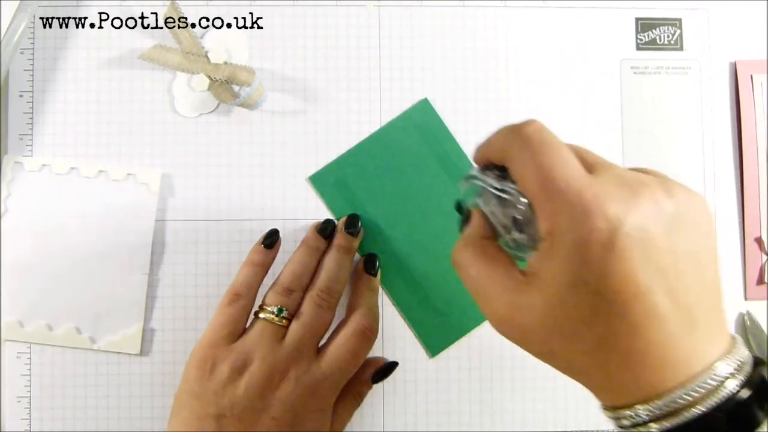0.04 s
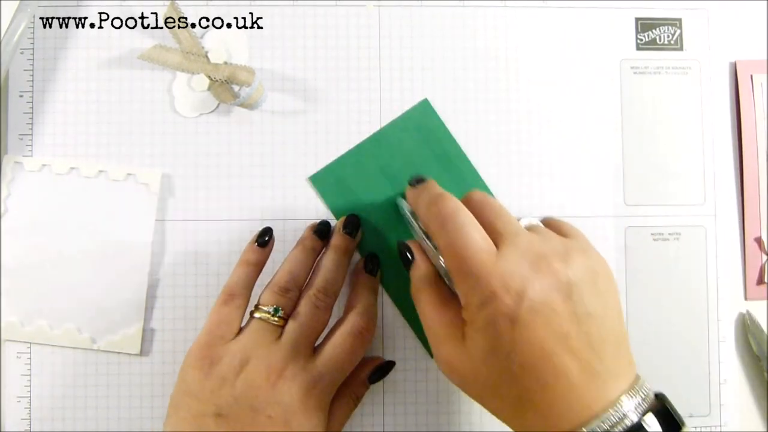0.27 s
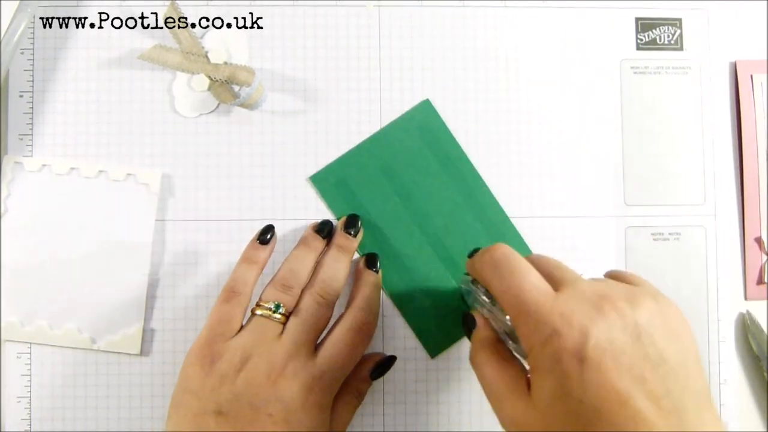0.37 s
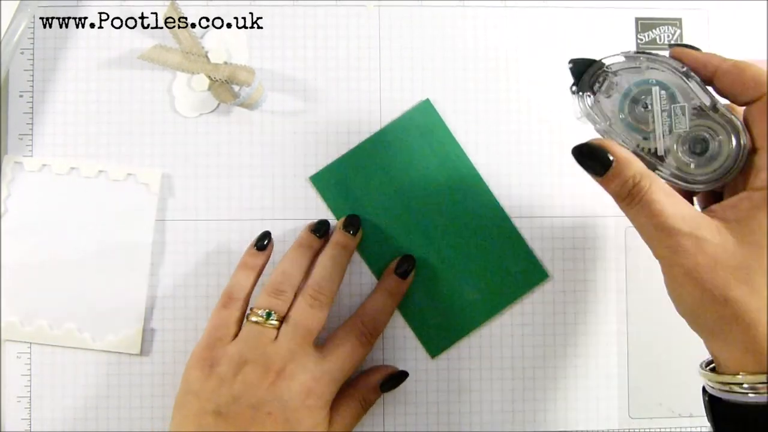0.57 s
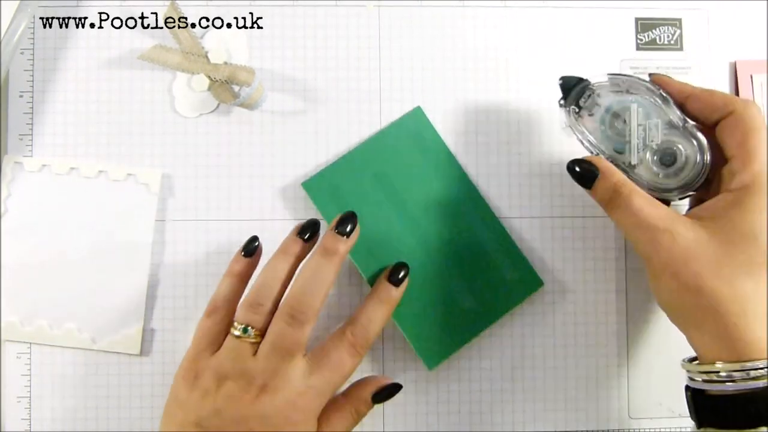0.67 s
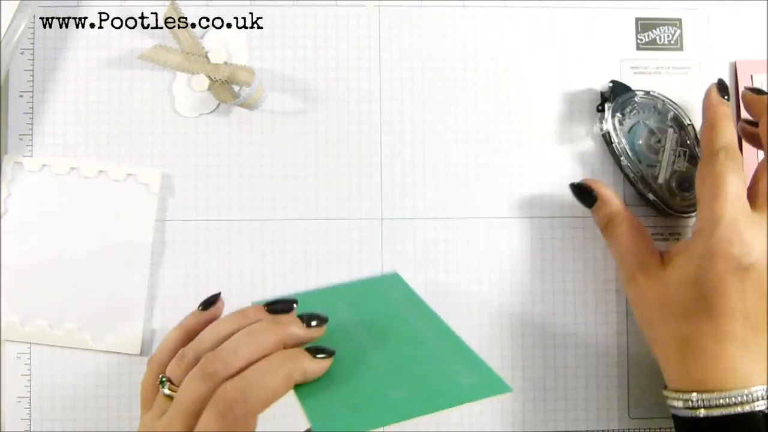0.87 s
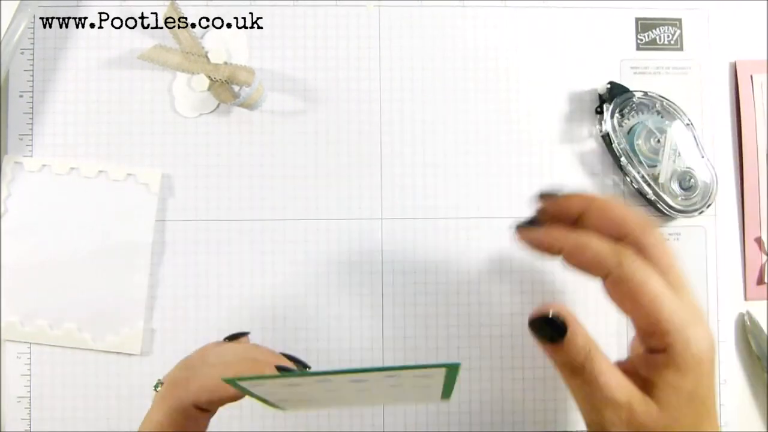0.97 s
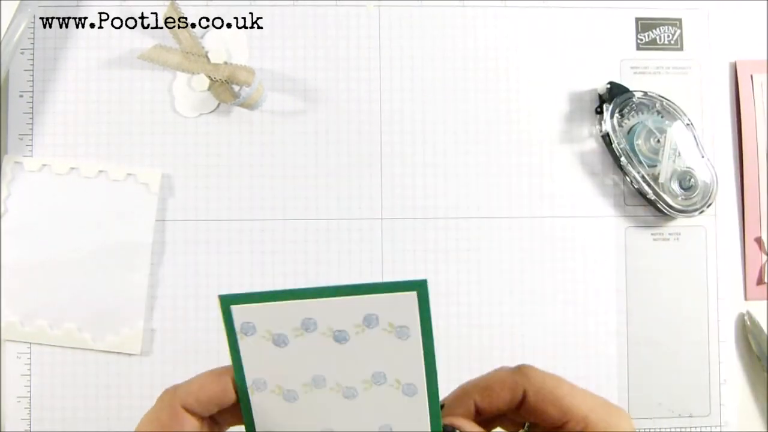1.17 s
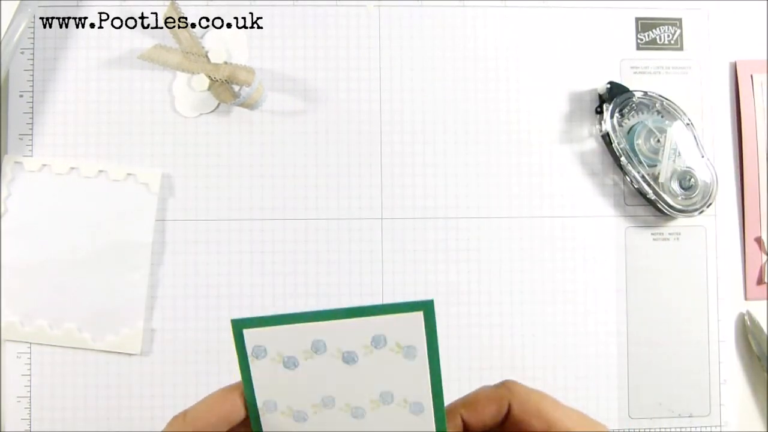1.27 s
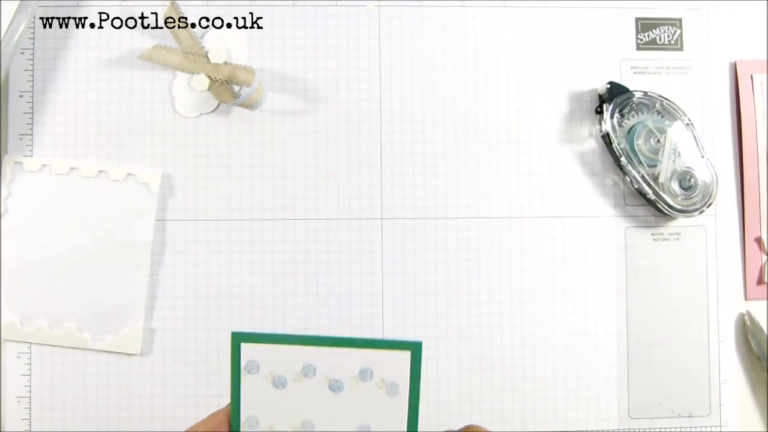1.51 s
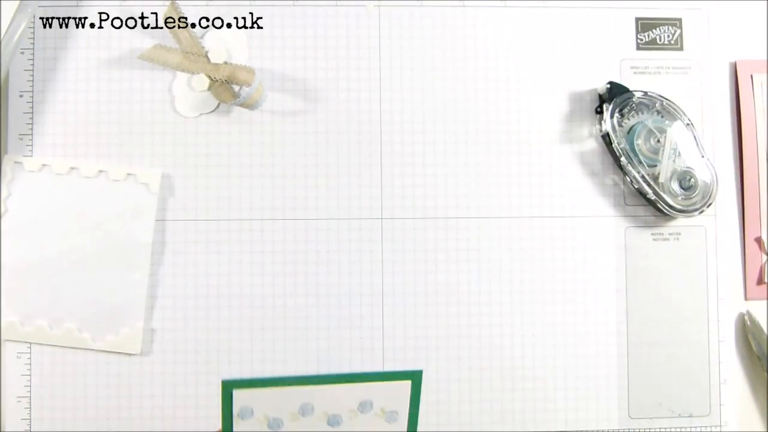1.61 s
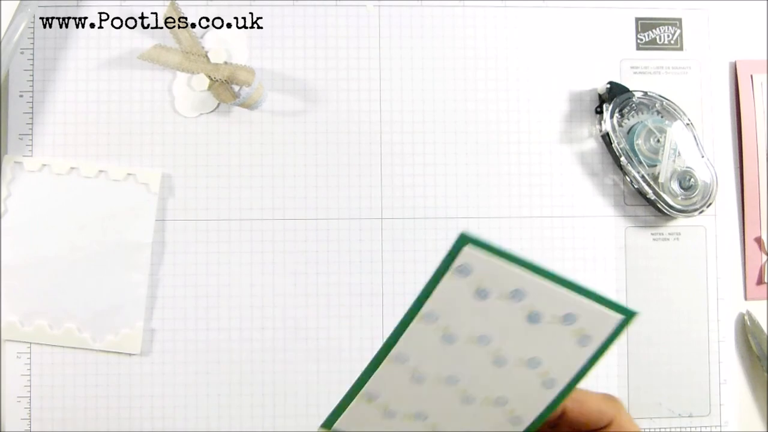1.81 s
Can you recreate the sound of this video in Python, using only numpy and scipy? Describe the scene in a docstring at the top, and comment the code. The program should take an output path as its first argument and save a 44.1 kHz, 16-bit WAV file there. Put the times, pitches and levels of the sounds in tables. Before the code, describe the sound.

An adhesive tape runner taps onto card, makes one quick, rasping zip, then its plastic case rattles and knocks as it is set down; light card flicks and taps follow in a quiet room, closely miked.

```python
"""First a quiet room with faint hiss and a low hum; then a tape runner lands on card, zips across it,
rattles and is put down on a craft table, and fingers flick, tap and slide the card.
The zip is dense random clicks, the knocks and flicks are short crackles; both ring case or card filters.
Decaying sine waves make the table top boom. Delays and fading noise make the room around it all."""
import sys
import numpy as np
from scipy import signal
from scipy.fft import rfft, irfft, next_fast_len
from scipy.io import wavfile
from scipy.ndimage import uniform_filter1d

SR = 44100
rng = np.random.default_rng(int(sys.argv[2]) if len(sys.argv) > 2 else 0)


def master_out(mix):
    """Clip the mix to full scale and print it as 16-bit PCM to the path in sys.argv[1]."""
    frames = np.transpose(np.atleast_2d(mix))
    ceiling = np.clip(frames, -1, 1)
    pcm = np.round(ceiling * 32767).astype(np.int16)
    wavfile.write(sys.argv[1], SR, pcm)


def field_ratio(decibels):
    """Amplitude ratio for a level in dB (20 dB per decade); scalars and array-likes work."""
    return 10 ** (np.asarray(decibels, dtype=float) / 20)


N = 81585  # length in samples


def unit(x):
    """Scale a sound to an rms strength of 1."""
    return x / np.sqrt(np.mean(x ** 2) + 1e-30)


def shape(x, gain):
    """Filter a sound by a gain that is a function of frequency in Hz."""
    size = next_fast_len(x.shape[-1] + 4096)
    hz = np.maximum(np.fft.rfftfreq(size, 1 / SR), 1)
    return irfft(rfft(x, size) * gain(hz), size)[..., :x.shape[-1]]


def colour(points):
    """Join (Hz, dB) points into a smooth gain along a logarithmic frequency axis."""
    hz, db = np.array(points).T
    return lambda f: field_ratio(np.interp(np.log(f), np.log(hz), db))


def high_pass(low_hz):
    """Gentle bass cut: a first-order filter."""
    return lambda f: 1j * f / (low_hz + 1j * f)


def tilt(db_per_octave, low_hz):
    """Brightness slope pivoting at 3 kHz, together with a second-order bass cut."""
    power = db_per_octave / (20 * np.log10(2))
    return lambda f: (1j * f / 3000) ** power * high_pass(low_hz)(f) ** 2


def ring(hz, width):
    """One resonance: a band-pass filter whose gain is 1 at its centre."""
    return lambda f: 1j * f * width / (hz ** 2 - f ** 2 + 1j * f * width)


def body(modes, struck_hz=None, focus_db=0):
    """All resonances of an object together; those near struck_hz are struck harder."""
    focus_octaves = 0.38

    def boost(hz):
        if struck_hz is None:
            return 0
        return focus_db * np.exp(-(np.log2(hz / struck_hz) / focus_octaves) ** 2)

    return lambda f: sum(field_ratio(db + boost(hz)) * ring(hz, width)(f) for hz, width, db in modes)


def walk(rate):
    """Smooth random level with spread 1: noise averaged twice over 1/rate seconds."""
    k = max(int(SR / rate), 1)
    noise = rng.standard_normal(N)
    return unit(uniform_filter1d(uniform_filter1d(noise, k), k))


def grit(size, per_s, spread_db):
    """Random clicks of either sign and of scattered, bounded strength."""
    present = rng.random(size) < per_s / SR
    strength = field_ratio(spread_db * np.minimum(rng.exponential(size=size), 3))
    return present * strength * np.sign(rng.standard_normal(size))


def add(out, start_s, x):
    """Mix x into out at start_s seconds."""
    i = int(start_s * SR)
    out[i:i + len(x)] += x[:len(out) - i]


def burst(db, length, gain):
    """A first click and a dying crackle through a filter; its energy follows level and length."""
    crackle_db, crackles_per_s, ring_s = -10, 4000, 0.0015
    t = np.arange(4096) / SR
    fade = np.exp(-t / max(length, 2e-4))
    x = field_ratio(crackle_db) * grit(4096, crackles_per_s, 2.7) * fade
    x[0] = 1  # the first click
    x = shape(x, gain)
    return field_ratio(db) * x * np.sqrt((length + ring_s) * SR / 20 / np.sum(x ** 2))


def widen(mid, side):
    """Make left and right differ mostly in the treble."""
    wide_hz, wide_db, wide_bass_db = 5560, 3, -18
    side = shape(side, lambda f: field_ratio(wide_db) * high_pass(wide_hz)(f) + field_ratio(wide_bass_db))
    return np.array([mid + side, mid - side])


# colour of the still room's hiss: (frequency [Hz], relative level [dB per Hz])
ROOM_HISS = [(15, -69), (25, -11), (108, -5.5), (263, -10), (405, -9.5), (607, -18), (936, -12.5),
             (1040, -18), (1160, -17), (11600, -25), (16000, -30.5)]
# hum lines: (frequency [Hz], level [dB])
HUM_LINES = [(57, -67.5), (114, -67.5), (172, -64)]


def air(t):
    """Steady hiss of the room, as coloured noise, and a hum of sine waves that waver in level."""
    hiss_db, waver_db = -63.5, -1
    mid, side = shape(rng.standard_normal((2, N)), colour(ROOM_HISS))
    # the hiss level counts only what lies above 200 Hz
    scale = field_ratio(hiss_db) / np.std(shape(mid, lambda f: f > 200))
    hum = sum(field_ratio(db + waver_db * walk(5.8)) * np.sin(2 * np.pi * hz * t) for hz, db in HUM_LINES)
    return scale * widen(mid, side) + hum


def fading(noise, t, t60):
    """Noise that dies by 60 dB in t60 seconds, scaled to the same energy for any t60."""
    return noise * 1000. ** (-t / t60) / np.sqrt(t60 * SR / np.log(1e6))


def scatter(x):
    """Dense short random reflections from hands and things nearby, redrawn every 12 ms."""
    redraw_s, near_t60_s, near_db, low_hz = 0.012, 0.073, -1, 504
    hop, size = int(redraw_s * SR), 8192
    t = np.arange(4096) / SR
    starts = np.arange(0, N, hop)
    # cut the sound into overlapping pieces and give each its own random reflections
    padded = np.pad(x, (hop, 2 * hop))
    pieces = padded[starts[:, None] + np.arange(2 * hop)] * np.hanning(2 * hop)
    reflections = fading(rng.standard_normal((2, len(starts), len(t))), t, near_t60_s)
    wet = irfft(rfft(pieces, size) * rfft(reflections, size), size)
    out = np.zeros((2, N + 2 * size))
    for k, i in enumerate(starts):
        out[:, i:i + size] += wet[:, k]
    return field_ratio(near_db) * shape(out[:, hop:hop + N], high_pass(low_hz))


# reflections from the table: (delay [s], level [dB])
REFLECTIONS = [(.0016, -20.5), (.0062, -15), (.0091, -13)]


def room(x):
    """Direct sound, table reflections, near scatter and a tail of bright and dull fading noise."""
    tail_db, bright_t60_s, dull_t60_s = -14, 0.45, 0.25
    t = np.arange(SR // 2) / SR
    bright, dull = rng.standard_normal((2, 2, len(t)))
    dull = unit(shape(dull, lambda f: 1 / (1 + 1j * f / 2500)))
    tail = fading(bright, t, bright_t60_s) + fading(dull, t, dull_t60_s)
    response = field_ratio(tail_db) * tail * np.minimum(t / 0.013, 1)  # the tail builds up over 13 ms
    for k, (delay, db) in enumerate(REFLECTIONS):
        response[:, int(delay * SR)] += field_ratio(db) * np.array([1, (-1) ** k])  # side flips each time
    response[0, 0] = 1  # direct sound
    mid, side = np.array([signal.fftconvolve(x, h)[:N] for h in response]) + scatter(x)
    return widen(mid, side)


# ringing modes of the table top: (frequency [Hz], relative level [dB], time to die by 60 dB [s])
TABLE_MODES = [(60.3, -13, 0.29), (82, -3, 0.28), (167.4, -6.5, .3), (255, -1, 0.096), (380, -8, 0.18),
               (550, -16.5, 0.13)]
# pushes: (time [s], relative level [dB], contact length [s], frequency of the modes most excited [Hz])
TABLE_PUSHES = [(.186, -43, 0.0017, 82), (.272, -45, 0.00085, 255), (0.314, -43, 0.0019, 255),
                (.36, -42, 0.0031, 171), (.563, -43, 0.0047, 117), (.746, -46.5, 0.0017, 255),
                (.837, -38, 0.0027, 82), (.907, -51, 0.0032, 82)]


def table(roll):
    """Soft pushes and the shaking roller ring the table top's decaying sine waves."""
    roll_db, focus_db = -27, 9.5
    t = np.arange(SR) / SR
    modes = np.array([field_ratio(db) * np.sin(2 * np.pi * hz * t) * 1000. ** (-t / t60)
                      for hz, db, t60 in TABLE_MODES])
    shaking = field_ratio(roll_db) * roll * rng.standard_normal(N) / 20
    out = signal.fftconvolve(shaking, modes.sum(0))[:N]
    mode_hz = np.array(TABLE_MODES)[:, 0]
    for s, db, contact, hz in TABLE_PUSHES:
        pulse = np.hanning(max(int(contact * SR), 4))
        nearness = np.exp(-np.log2(mode_hz / hz) ** 2 * 2)
        weight = field_ratio(db + focus_db * nearness)
        add(out, s, signal.fftconvolve(weight @ modes, pulse / pulse.sum()))
    return out


# resonances of the card: (frequency [Hz], width [Hz], relative level [dB])
CARD_MODES = [(375, 50, -3.5), (535, 30, -11), (940, 220, -0.5), (1490, 200, -7), (2450, 560, -1.5),
              (3400, 440, -1), (5100, 1600, -18)]
# flicks and creases of the card: (time [s], relative level [dB], frequency of the modes most
# excited [Hz], brightness [dB per octave], crackle length [s])
CARD_FLICKS = [(1.198, -48, 2450, -6.5, 0.0076), (1.2215, -33, 1010, -4.5, 0.0032),
               (1.261, -55, 2440, 2, 0.0025), (1.3307, -20, 3250, -0.5, 0.0033),
               (1.4507, -35, 3350, -3.5, 0.0031), (1.551, -54, 2480, 4, 0.0046),
               (1.5638, -21, 3320, -4, 0.0013), (1.5655, -26.5, 380, -6, 0.0029),
               (1.588, -39, 3330, -1.5, 0.0047)]
# card sliding under the fingers: (start [s], rise [s], fall [s], level [dB], brightness [dB per octave])
CARD_SLIDES = [(-.05, 0.043, 0.04, -58, -5.5), (.19, 0.008, 0.022, -36, -6.5),
               (.52, 0.022, 0.071, -57.5, -2), (0.628, 0.0087, 0.028, -53, -9),
               (.87, 0.016, 0.032, -43, -25), (1.06, 0.035, 0.23, -63.5, -4),
               (1.15, 0.066, 0.014, -52.5, -3.5), (1.34, 0.048, 0.044, -56, -5.5),
               (1.733, 0.012, 0.055, -54.5, 1), (1.74, 0.042, 0.044, -54, 1)]


def card(t):
    """Flicks are crackles with a short papery ring; slides are soft, flickering grit."""
    ring_db, focus_db, flick_low_hz = 0.5, 5, 320
    slide_low_hz, flicker_db = 1260, 2
    out = np.zeros(N)
    for s, db, hz, bright, length in CARD_FLICKS:
        slope, paper = tilt(bright, flick_low_hz), body(CARD_MODES, hz, focus_db)
        add(out, s, burst(db + 2.5, length, lambda f: slope(f) * (1 + field_ratio(ring_db) * paper(f))))
    for s, rise, fall, db, bright in CARD_SLIDES:
        u = t - s - rise  # time from the loudest moment
        growing = np.clip(1 + u / rise, 0, 1) ** 2
        dying = np.exp(-np.maximum(u, 0) / fall)
        envelope = np.where(u < 0, growing, dying)
        rub = unit(shape(grit(N, 9000, 1.72), tilt(bright, slide_low_hz)))
        out += field_ratio(db + flicker_db * walk(26.7)) * envelope * rub
    return out


# resonances of the plastic case, also rung by the zip: (frequency [Hz], width [Hz], relative level [dB])
CASE_MODES = [(1290, 200, -6.5), (1661, 260, 6.5), (2080, 200, -1.5), (2900, 83, 3.5), (3400, 640, -3),
              (4300, 440, 3), (5050, 660, -0.5), (6800, 430, 4), (8400, 1500, -10.5)]
# knocks and rattles of the case: (time [s], relative level [dB], frequency of the modes most
# excited [Hz], brightness [dB per octave], rattle length [s])
CASE_KNOCKS = [(0.187, -29, 816, -8, 0.0038), (0.194, -25, 2590, -5, 0.0086),
               (0.2595, -28, 4300, 4, 0.0053), (0.407, -17, 1550, -2.5, 0.017),
               (0.542, -29, 2900, 1, 0.0022), (0.563, -35, 800, -4, 0.0038), (0.573, -38.5, 4470, 3, .004),
               (0.6352, -31, 2000, 0, 0.0049), (0.643, -37, 2000, 1, 0.0029), (0.655, -31, 5700, 6, 0.0032),
               (0.664, -34, 2140, -2.5, 0.0057), (0.744, -14, 2030, -2, 0.0056),
               (0.751, -15, 2340, -2.5, 0.0062), (.773, -20.5, 8400, -2, 0.0057),
               (0.8323, -31, 3080, -6.5, 0.0022), (0.8346, -13, 5200, -3, 0.0054),
               (0.845, -30, 4700, -3, 0.03), (0.908, -29.5, 4300, -5, 0.0037),
               (.985, -34, 4300, -3, 0.0036), (1.047, -38.5, 3400, -3, 0.0058)]
# the roller catches and jerks free: (time [s], peak level before the room [dB])
ROLLER_BITES = [(.2062, -23), (.2095, -28), (.2408, -18), (.2525, -21), (.416, -20), (.4295, -21)]


def knocks():
    """The loose cartridge cracks and rings the case; the biting roller rings its lowest modes."""
    crack_db, focus_db = 6.5, 14
    bite_hz, bite_focus_db, bite_s = 1450, 11, 0.002
    out = np.zeros(N)
    for s, db, hz, bright, length in CASE_KNOCKS:
        slope, case = tilt(bright, 500), body(CASE_MODES, hz, focus_db)
        add(out, s, burst(db - 0.5, length, lambda f: slope(f) * (case(f) + field_ratio(crack_db) / 2)))
    for s, db in ROLLER_BITES:
        bite = burst(0, bite_s, body(CASE_MODES, bite_hz, bite_focus_db))
        add(out, s, field_ratio(db) * bite / np.abs(bite).max())
    return out


# pull of the runner: (time [s], relative level [dB], treble raised and bass lowered by [dB])
RUNNER_PULL = [(0.233, -37, -7), (0.242, -21.5, -7.5), (.262, -23.5, -4), (0.283, -21, -1.5),
               (0.304, -17.5, -1.5), (.326, -20.5, 0.5), (0.346, -23, 0.5), (0.377, -23, 1),
               (.395, -23.5, 0.5), (0.408, -26, -3.5), (0.434, -26, -2), (.445, -36.5, -6),
               (0.471, -53.5, 9)]
# colour of the peeling tape: (frequency [Hz], relative level [dB per Hz])
PEEL_COLOUR = [(88, -33), (150, -15.5), (254, -9.5), (790, -16), (1290, -3), (2310, -5), (2870, 0),
               (5570, -4.5), (6910, -10), (14000, -8), (16000, -22)]


def zip_tape(t):
    """Glue lets go in dense juddering clicks that ring the case; also returns the level."""
    clicks_per_s, spread_db, case_db = 11000, 3, -5.5
    judder_db, judder_hz = 1.5, 160
    s, db, bright = np.array(RUNNER_PULL).T
    level = field_ratio(np.interp(t, s, db, -120, -120) + judder_db * walk(judder_hz))
    clicks = grit(N, clicks_per_s, spread_db)
    peel = unit(shape(clicks, colour(PEEL_COLOUR)))
    case = unit(shape(clicks, body(CASE_MODES)))
    both = peel + field_ratio(case_db) * case
    # split at about 2.5 kHz so that the brightness can change with time
    low = shape(both, lambda f: 1 / (1 + 1j * f / 2500) ** 2)
    lean = np.interp(t, s, bright)
    return level * (field_ratio(-lean) * low + field_ratio(lean) * (both - low)) / 2, level


def pan(db):
    """Left and right gains; db is how much louder the left is."""
    return field_ratio(np.array([[db], [-db]]) / 2)


def scene():
    """Runner a little to the right; card and table closer to the middle."""
    t = np.arange(N) / SR
    tape, roll = zip_tape(t)
    runner = room(tape + knocks()) * pan(-1.5)
    fingers = room(card(t)) * pan(-0.5)
    return air(t) + table(roll) * pan(-0.47) + fingers + runner


def low_pass(x):
    """Removes everything above the highest recorded frequency."""
    return signal.sosfilt(signal.butter(12, 16520, fs=SR, output="sos"), x)


def record(dry):
    """The microphone loses the deepest bass and the top of the treble."""
    low_hz, top_hz = 48.6, 14350
    mix = shape(dry, lambda f: high_pass(low_hz)(f) ** 3 / (1 + (f / top_hz) ** 12))
    return low_pass(mix)


dry = scene()
out = record(dry)
master_out(out)
```